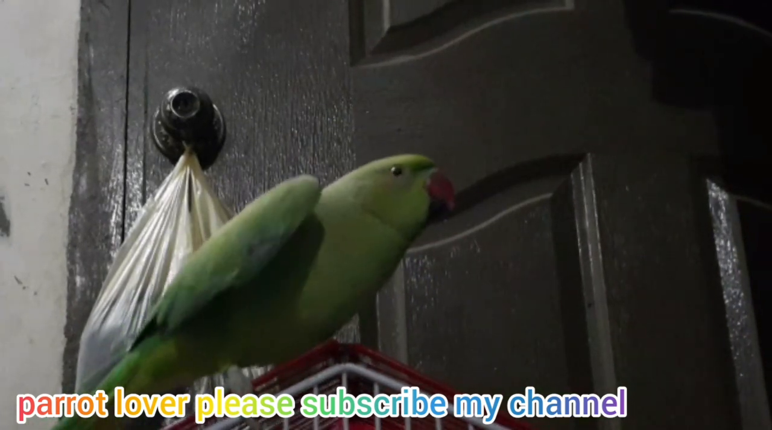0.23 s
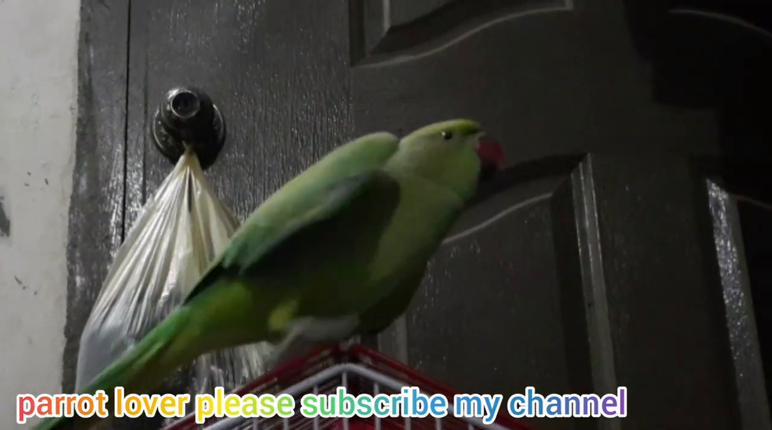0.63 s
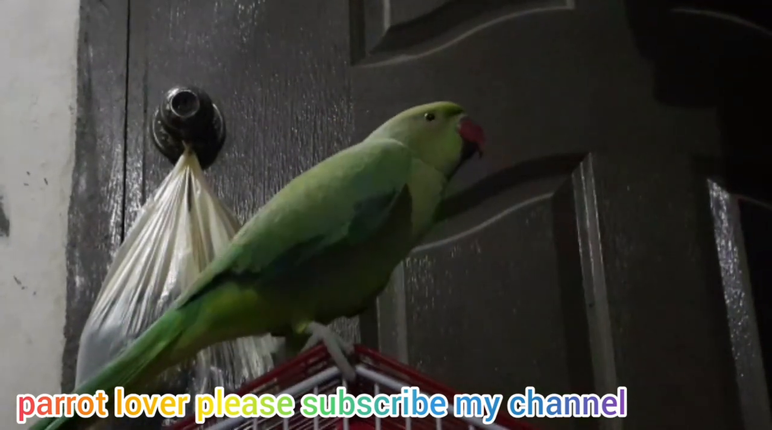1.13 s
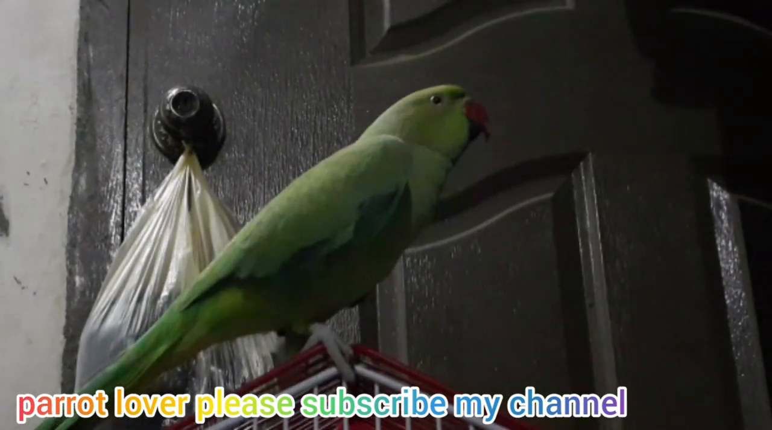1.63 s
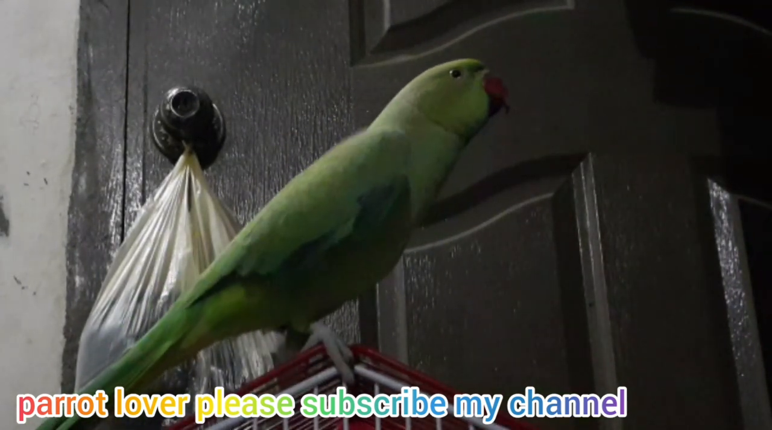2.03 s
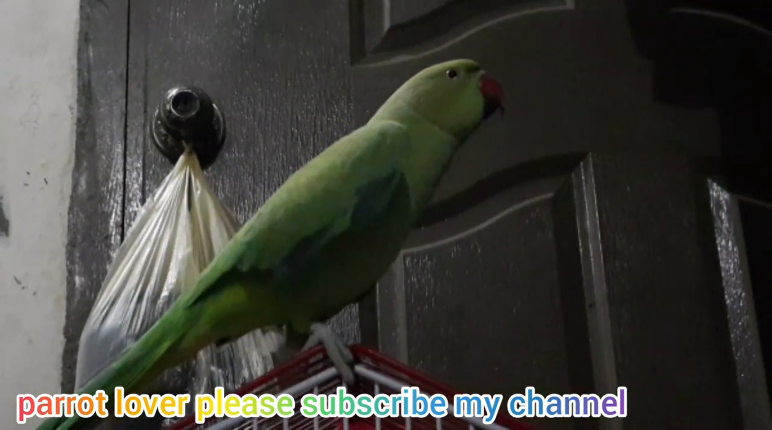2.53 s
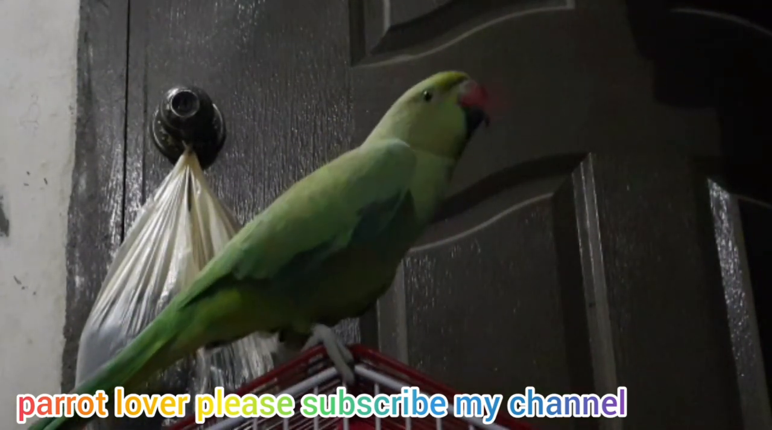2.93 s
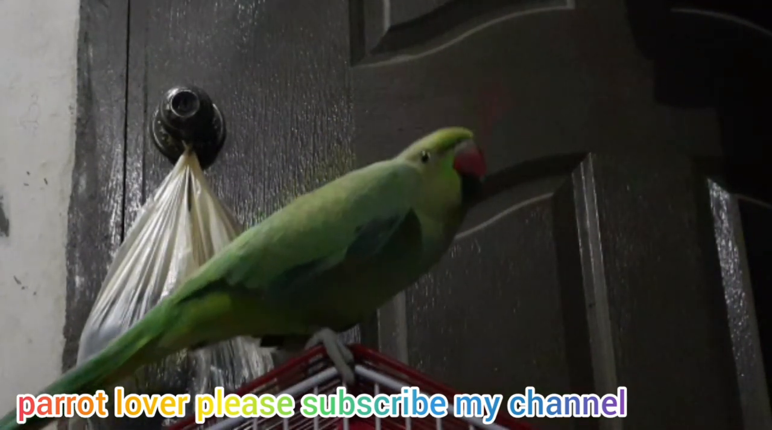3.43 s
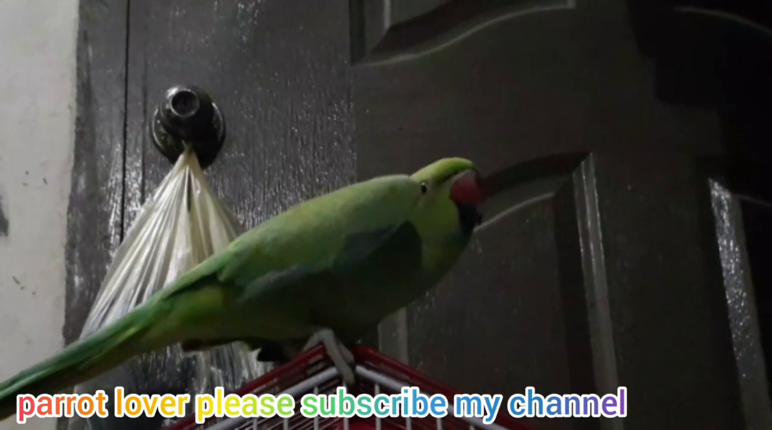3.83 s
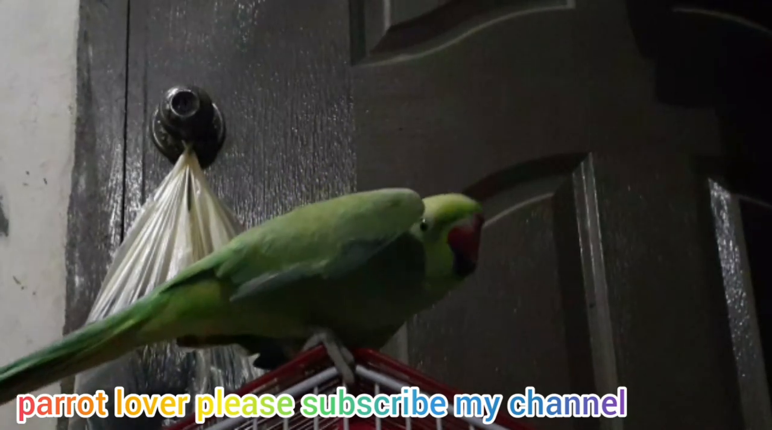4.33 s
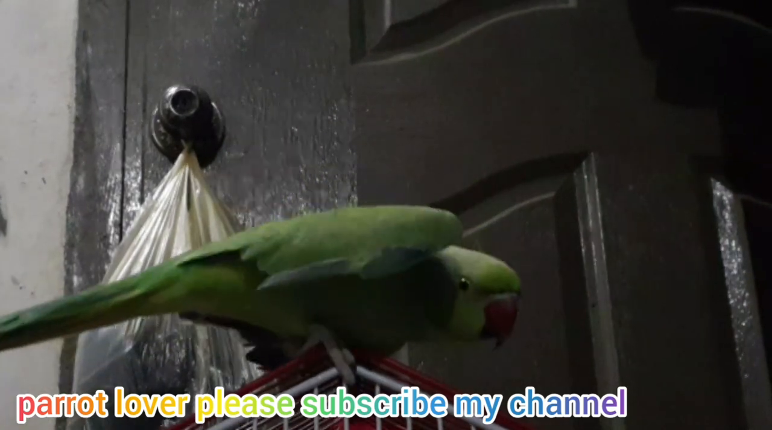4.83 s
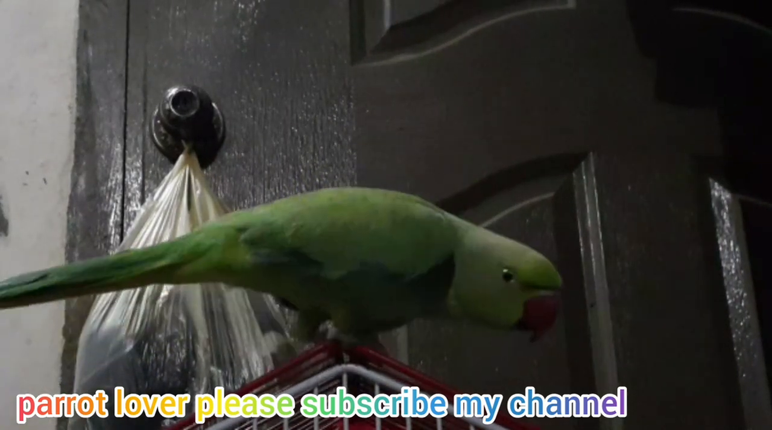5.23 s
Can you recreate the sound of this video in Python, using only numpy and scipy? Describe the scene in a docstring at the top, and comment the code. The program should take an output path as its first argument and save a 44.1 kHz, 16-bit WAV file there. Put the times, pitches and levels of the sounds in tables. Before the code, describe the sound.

A parakeet calls close to the microphone in a small, hard-walled room that adds a short echo. Right at the start it gives one sharp, high, rising chirp. From about 0.6 to 1 second come two airy whistles, the first climbing slowly, the second dipping and shooting up. Between 1.8 and 2.7 seconds it makes five softer, low, raspy clucks, evenly spaced. At 3 seconds a loud, harsh, very short rattle opens into a brief nasal whine. A cleaner whistle falls and levels off from 3.5 to 3.75 seconds. From about 3.95 to 4.35 seconds a rich, drawn-out squawk arches up and down, hardening as it goes. Under the calls lie a faint low room rumble and a few barely audible drifting tones. The rumble eases once the bird stops, and a very soft rustle comes at about 5.4 seconds.

```python
"""A small, hard-walled room, a ring-necked parakeet calling close by: gliding whistles, five low clucks,
a rattle that opens into a whine, a falling whistle and an arched squawk. Its syrinx sounds a harmonic
stack shaped by throat and beak, or slaps open in noisy bursts for the rattle. Pitch and effort set the
timbre; a slow flutter now and then splits the tone. Door and walls answer. Under the calls lie a low
rumble and a few faint drifting tones; a soft rustle comes at the end."""
import sys
import numpy as np
from scipy import signal
from scipy.fft import rfft, irfft, next_fast_len
from scipy.io import wavfile
from scipy.ndimage import uniform_filter1d, map_coordinates

SR = 44100
rng = np.random.default_rng(int(sys.argv[2]) if len(sys.argv) > 2 else 0)


def persist_wave(psi):
    """Save psi, clipped to +-1, as 16-bit WAV."""
    counts = np.round(np.clip(psi, -1, 1) * 32767).astype(np.int16)
    wavfile.write(sys.argv[1], SR, np.atleast_2d(counts).T)


N = 242550
TOP_HZ = 15900
FLUTTER_HZ, FLUTTER_TREBLE_DB_PER_RAD = 336.5, 33


def amp(db):
    """Decibels to gain."""
    return 10 ** (np.asarray(db) / 20)


def unit(x):
    """Scale to rms 1."""
    return x / np.sqrt(np.mean(x ** 2) + 1e-20)


def along(points, hz):
    """(Hz, value) points read on a log axis."""
    f, v = np.transpose(points)
    return np.interp(np.log(hz + 1), np.log(f + 1), v)


def curves(rows, at):
    """Each later column, interpolated over the first."""
    axis, *columns = np.transpose(rows)
    return [np.interp(at, axis, column) for column in columns]


def wobble(knots_per_s, t):
    """Smooth random curve."""
    return map_coordinates(rng.standard_normal(8192), [(t - t[0]) * knots_per_s], mode="wrap")


def gate(t, start_s, end_s, attack_s, release_s):
    """Smooth onset, hold, exponential release."""
    onset = np.sin(np.pi / 2 * np.clip((t - start_s) / attack_s + .5, 0, 1)) ** 2
    return onset * np.exp(-np.maximum(t - end_s, 0) / release_s)


def filtered(x, response):
    """Zero-phase filter; response maps Hz to gain."""
    size = next_fast_len(x.shape[-1] + 8192)
    return irfft(rfft(x, size) * response(np.fft.rfftfreq(size, 1 / SR)), size)[..., :x.shape[-1]]


def coloured(noise, colour):
    """Noise shaped by (Hz, dB) points, at rms 1."""
    return unit(filtered(noise, lambda hz: amp(along(colour, hz))))


def stereo_noise(samples, coherence):
    """Noise pair with left-right coherence set by (Hz, coherence) points."""
    def mid_side_gains(hz):
        angle = np.arccos(np.clip(along(coherence, hz), -1, 1)) / 2
        return np.array([np.cos(angle), np.sin(angle)])
    mid, side = filtered(rng.standard_normal((2, samples)), mid_side_gains)
    return np.array([mid + side, mid - side])


def rumble(t, level_db=-63, drop_db=4, drop_at_s=4.4):
    """Low room noise that drops as the bird falls silent."""
    # Each row: frequency in Hz, relative density in dB.
    colour = [(28, -20.5), (44, 4.5), (62, -10), (91, -7), (178, -0.5), (331, -4), (440, -9.5), (537, -7),
              (848, -10.5), (1110, -18.5), (1450, -23), (1700, -19), (2120, -30), (15500, -40)]
    noise = stereo_noise(N, coherence=[(120, .87), (950, 1.0), (4000, .13)])
    settled = np.clip((t - drop_at_s) / .21 + .5, 0, 1)
    return coloured(noise, colour) * amp(level_db - drop_db * settled)


def faint_tones(t, gain_db=8, sag_per_s=.17, thin_hz=1740, thin_db=-85.5):
    """Brief tones sagging in pitch, plus one thin tone that wavers throughout."""
    # Each row: start in seconds, end in seconds, starting pitch in Hz, level in dB before gain_db.
    notes = [(0.01, 0.214, 930, -72), (0.218, 0.3, 644.5, -69), (0.097, 0.285, 319, -69),
             (.33, .62, 874, -75), (1.77, 1.864, 396, -63), (1.965, 2.086, 402, -65),
             (2.11, 2.587, 357.9, -70.5)]
    tones = np.zeros(N)
    for start_s, end_s, start_hz, db in notes:
        pitch_hz = start_hz * np.exp(-sag_per_s * (t - start_s)) * (1 + .022 * wobble(90, t))
        envelope = amp(db + gain_db + 4 * wobble(25, t)) * gate(t, start_s, end_s, .044, .03)
        tones += envelope * np.sin(2 * np.pi * np.cumsum(pitch_hz) / SR)
    wavering_hz = thin_hz * (1 + .012 * wobble(87, t))
    return tones + amp(thin_db) * np.sin(2 * np.pi * np.cumsum(wavering_hz) / SR)


def rustle(t, start_s=5.41, end_s=5.5, level_db=-73):
    """One soft puff of high noise."""
    # Each row: frequency in Hz, gain in dB.
    colour = [(1500, -20), (4000, -7), (10000, -9), (15000, 3)]
    envelope = amp(level_db + 2 * wobble(56, t)) * gate(t, start_s, end_s, .016, .03)
    return envelope * coloured(rng.standard_normal((2, N)), colour)


def small_room(x, early_db=-6, tail_db=-6.5, build_s=.0021):
    """Direct sound, echoes from the door and near walls, and a diffuse tail."""
    # Each row: left delay in seconds, right delay in seconds, gain in dB before early_db.
    echoes = [(.0011, 0.00096, -20), (.0027, .0024, -10), (.0046, 0.01, -3.5), (.0078, 0.0013, -14.5),
              (0.0098, 0.014, -15)]
    # Each row: frequency in Hz, T60 in seconds.
    t60_s = [(300, 0.35), (900, 0.19), (2000, 0.24), (4000, 0.24), (8000, 0.26), (15000, 0.16)]
    # Each row: frequency in Hz, left-right coherence.
    coherence = [(300, .9), (1000, .7), (3000, 0.13), (8000, 0.033)]
    hz, t, spectra = signal.stft(stereo_noise(SR // 2, coherence), SR, nperseg=256)
    envelope = amp(-60 * t / along(t60_s, hz)[:, None]) * (1 - np.exp(-t / build_s))
    _, tail = signal.istft(spectra * envelope, SR, nperseg=256)
    response = amp(tail_db) * tail / np.linalg.norm(tail[0])
    response[[0, 1], [1, 0]] += 1  # direct sound: right leads by one sample
    for left_s, right_s, db in echoes:
        response[[0, 1], [round(left_s * SR), round(right_s * SR)]] += amp(early_db + db)
    return signal.fftconvolve(x, response, axes=1)[:, :N]


def door_notch(x, centre_hz=972, width_hz=110, depth_db=5):
    """The door's reflection partly cancels the bird in one narrow band."""
    return filtered(x, lambda hz: amp(-depth_db * np.exp(-((hz - centre_hz) / width_hz) ** 2)))


def head_turns(x, t):
    """Mono to stereo; the balance shifts as the head turns."""
    # Each row: time in seconds, left minus right in dB.
    pan = [(0, -3), (3.25, -2.5), (3.54, -5), (3.59, 2.5), (3.75, -0.5), (4.03, -1.5)]
    pan_db, = curves(pan, t)
    return x * amp(np.array([pan_db, -pan_db]) / 2)


def beak_beam(x):
    """The beak beams the treble near 5 kHz to the right."""
    # Each row: frequency in Hz, left minus right in dB.
    balance = [(700, 0.5), (1400, 0.5), (2800, 1), (5000, -2), (12000, 0.5)]
    return filtered(x, lambda hz: amp(np.array([along(balance, hz), -along(balance, hz)]) / 2))


def flutter_rad(t):
    """Phase depth of a second, slower vibration that adds side tones to every harmonic."""
    # Each row: centre in seconds, half length in seconds, depth in radians.
    spells = [(3.212, 0.023, 0.15), (3.587, 0.077, .12), (3.739, .035, 0.36), (4.313, 0.022, 0.13)]
    return sum(rad * np.exp(-((t - centre_s) / half_s) ** 2) for centre_s, half_s, rad in spells)


def membrane_phase(t, pitch_hz, jitter, slack_below_hz=1200, collapse_per_s=10):
    """The membranes never hold pitch exactly; as a low note collapses they go slack and hoarse."""
    fall_per_s = -np.gradient(np.log(pitch_hz)) * SR
    slack = np.clip(fall_per_s / collapse_per_s, 0, 1) * (pitch_hz < slack_below_hz)
    unsteadiness = jitter + .03 * uniform_filter1d(slack, size=256)
    phase = 2 * np.pi * np.cumsum(pitch_hz * (1 + unsteadiness * wobble(1000, t))) / SR
    return phase + flutter_rad(t) * np.sin(2 * np.pi * FLUTTER_HZ * t)


def syrinx(controls, throat, jitter, rasp, hiss_db, attack_s, treble_hz=7600, full_voice_db=-35):
    """One call: a gliding harmonic stack, shaped by throat and beak."""
    start_s, end_s = controls[0][0], controls[-1][0]
    span = np.arange(max(int((start_s - .02) * SR), 0), int((end_s + .04) * SR))
    t = span / SR
    pitch_hz, level_db, overtones_db, treble_db = curves(controls, t)
    phase = membrane_phase(t, pitch_hz, jitter)
    k = np.arange(2, 33)[:, None]
    hz = k * pitch_hz
    softness = np.clip((full_voice_db - level_db) / 7, 0, 2)  # soft notes roll off faster
    weight = amp(along(throat, hz)) * np.clip((TOP_HZ - hz) / 500 + 1, 0, 1) * k ** -softness
    high = np.clip((hz - treble_hz) / 800 + .5, 0, 1)
    normalised = lambda w: w / np.sqrt(np.sum(w ** 2, axis=0) + 1e-9)
    weight = normalised(weight * (1 - high)) + amp(treble_db) * normalised(weight * high)
    # Turbulent air shakes each overtone and hisses between the highest ones.
    shake = 1 + rasp * np.array([wobble(1200, t) for _ in k])
    hiss_band = lambda f: amp(along(throat, f)) * f ** 4 / (f ** 4 + treble_hz ** 4)
    hiss = unit(filtered(rng.standard_normal(len(t)), hiss_band))
    overtones = np.sum(weight * shake * np.sin(k * phase), axis=0) + amp(treble_db + hiss_db) * hiss
    power = (1 + amp(overtones_db) ** 2 * (1 + amp(treble_db) ** 2)) / 2
    voice = (np.sin(phase) + amp(overtones_db) * overtones) / np.sqrt(power)
    call = np.zeros(N)
    call[span] = amp(level_db) * voice * gate(t, start_s, end_s, attack_s, .003)
    return call


def contour(glide):
    """Time, pitch and level of a glide, finely stepped."""
    t = np.linspace(glide[0][0], glide[-1][0], 400)
    return t, *curves(glide, t)


def whistled(glide, overtones_db, treble_db):
    """Syrinx controls for a whistle: pitch sets the timbre, flutter brightens it."""
    # Each row: pitch in Hz, overtones re fundamental in dB, treble re overtones in dB; calls add offsets.
    registers = [(615, -13.5, -18.5), (1203, -23, -30), (1450, -21.5, -26.5), (1832, -25, 5),
                 (2070, -20, 1.5), (2450, -14, -2.5), (2800, -8.5, -7), (3650, -16, -6)]
    t, pitch_hz, level_db = contour(glide)
    base_overtones_db, base_treble_db = curves(registers, pitch_hz)
    bright_db = base_treble_db + treble_db + FLUTTER_TREBLE_DB_PER_RAD * flutter_rad(t)
    return np.column_stack([t, pitch_hz, level_db, base_overtones_db + overtones_db, bright_db])


def pressed(t, pitch_hz, level_db, overtones_db, treble_db, harden_db, dulling):
    """Syrinx controls for a low call: overtones dull below mean level and ramp by harden_db."""
    soft_db = dulling * np.minimum(level_db - np.mean(level_db), 0)
    ramp_db = harden_db * np.linspace(-.5, .5, len(t))
    # The treble dulls faster than the overtones and falls behind as they grow.
    bright_db = treble_db + 2.2 * soft_db - 1.1 * ramp_db + FLUTTER_TREBLE_DB_PER_RAD * flutter_rad(t)
    return np.column_stack([t, pitch_hz, level_db, overtones_db + soft_db + ramp_db, bright_db])


def cluck_contour(top_s, rise_s, fall_s, width_s, top_hz, top_db, swell_db_per_s=279, push_db=4):
    """Time, pitch and level of a cluck: it swells as it climbs, then collapses with a last push."""
    t = np.linspace(-rise_s, fall_s, 100)
    rising = t < 0
    arch = np.exp(-(t / np.where(rising, width_s, .65 * width_s)) ** 2)
    base_hz = np.where(rising, 569, 494.8)
    level_db = top_db + np.where(rising, swell_db_per_s * t, push_db * np.sin(np.pi * t / fall_s))
    return top_s + t, base_hz + (top_hz - base_hz) * arch, level_db


def clucks():
    """Five low, raspy arches of pitch."""
    # Each row: time of the top, rise, fall and width in seconds, top pitch in Hz, level there in dB.
    arches = [(1.799, .005, 0.036, 0.026, 1133, -46), (1.987, .0095, 0.029, 0.024, 1080, -38),
              (2.21, .049, .045, .038, 960, -34.5), (2.454, .054, .038, 0.028, 955, -35),
              (2.703, 0.054, .035, .029, 980, -36.5)]
    # Each row: frequency in Hz, gain in dB.
    throat = [(900, 12.5), (1300, 7), (1850, 11), (2700, -6), (3700, 8), (4500, -10), (5500, 9),
              (6800, -17), (8500, -30), (11000, -45), (15500, -40.5)]
    calls = np.zeros(N)
    for arch in arches:
        controls = pressed(*cluck_contour(*arch), overtones_db=4.5, treble_db=-15, harden_db=3, dulling=.75)
        calls += syrinx(controls, throat, jitter=.014, rasp=.38, hiss_db=-6, attack_s=.009)
    return calls


def rattle(t):
    """The syrinx slaps open about sixty times a second, each time with a harsh burst."""
    # Each row: start in seconds, level in dB, length in seconds.
    bursts = [(2.9952, -41, 0.0049), (3.0111, -42, 0.0096), (3.0274, -17, 0.0072), (3.0435, -19.5, 0.0093),
              (3.0616, -14, .0062), (3.0794, -14, .0072), (3.0972, -17, .0052)]
    # Each row: frequency in Hz, gain in dB.
    throat = [(300, -49), (700, -19.5), (1200, -11), (1700, -3), (2400, -1.5), (3300, 1.5), (4400, -11),
              (6300, -14), (8500, -21.5), (10000, -33.5), (11500, -23), (16000, -30)]
    envelope = sum(amp(db) * gate(t, start_s, start_s + length_s / 2, .0049, length_s / 3)
                   for start_s, db, length_s in bursts)
    return envelope * coloured(rng.standard_normal(N), throat)


def whine():
    """A held note whose overtones outweigh the fundamental."""
    # Each row: time in seconds, pitch in Hz, level in dB.
    glide = [(3.157, 1592, -25.5), (3.171, 1522, -26), (3.189, 1449, -23.5), (3.205, 1503, -22.5),
             (3.225, 1498, -24.5), (3.249, 1597, -30.5)]
    # Each row: frequency in Hz, gain in dB.
    throat = [(2950, 6), (4450, 0), (5850, -6), (7350, -19), (8900, -24.5), (11600, -28.5), (15400, -37.5)]
    controls = pressed(*contour(glide), overtones_db=10, treble_db=-21, harden_db=-.5, dulling=.4)
    return syrinx(controls, throat, jitter=.005, rasp=.15, hiss_db=-11, attack_s=.004)


def whistles():
    """High, nearly pure glides with an airy edge: three rise, a cleaner one falls."""
    # Each row: time in seconds, pitch in Hz, level in dB.
    upsweep = [(0.002, 1790, -27.5), (0.016, 1844, -32.5), (0.044, 2740, -27.5), (0.062, 3470, -20.5),
               (0.07, 3640, -16.5), (0.08, 3660, -22)]
    slow_rise = [(0.626, 634.6, -53), (0.636, 944, -55.5), (0.644, 1147, -46), (0.678, 1218, -47.5),
                 (0.74, 1707, -35.5), (0.774, 2232, -32.5), (0.802, 2509, -25.5), (0.828, 2905, -28),
                 (0.84, 2950, -33)]
    dip_and_rise = [(0.874, 3280, -26.5), (0.884, 2983, -26.5), (0.902, 2447, -26.5), (0.92, 2133, -40.5),
                    (0.954, 1932, -37), (0.978, 2032, -34.5), (0.992, 2315, -24.5), (1.012, 2973, -17.5),
                    (1.028, 3447, -18)]
    downsweep = [(3.458, 2850, -40.5), (3.462, 2913, -36), (3.492, 2412, -30), (3.516, 2277, -29),
                 (3.57, 2029, -48.5), (3.6, 1950, -32), (3.634, 1908, -24.5), (3.668, 1810, -21),
                 (3.72, 1984, -20), (3.732, 2015, -28), (3.751, 2024, -31)]
    # Each row: frequency in Hz, gain in dB.
    throat = [(2400, 18), (3600, 2), (5600, -4.5), (7300, -6), (8400, -5), (10300, 3), (12100, -9.5),
              (13300, -1.5), (15600, -9.5)]
    rises = (whistled(upsweep, overtones_db=4.5, treble_db=-4),
             whistled(slow_rise, overtones_db=0, treble_db=3),
             whistled(dip_and_rise, overtones_db=-4.5, treble_db=5))
    fall = whistled(downsweep, overtones_db=0, treble_db=-1)
    rising = sum(syrinx(rise, throat, jitter=.011, rasp=.38, hiss_db=-2, attack_s=.006) for rise in rises)
    return rising + syrinx(fall, throat, jitter=.003, rasp=.18, hiss_db=-12, attack_s=.014)


def squawk():
    """A long, low arch of pitch, rich in overtones and hardening as it goes."""
    # Each row: time in seconds, pitch in Hz, level in dB.
    glide = [(3.944, 553, -40), (3.956, 741, -45), (3.972, 953, -39.5), (3.998, 937.6, -29),
             (4.012, 993, -37.5), (4.028, 1045, -30.5), (4.078, 1141, -24), (4.144, 1335, -23.5),
             (4.208, 1205, -23), (4.232, 1212, -21), (4.26, 1111, -20), (4.274, 1025, -27.5),
             (4.304, 937.5, -20), (4.326, 772, -26.5), (4.348, 603.6, -36.5)]
    # Each row: frequency in Hz, gain in dB.
    throat = [(1300, 5), (1900, 8.5), (2400, 7.5), (2900, -2.5), (3700, 3.5), (4900, 9), (6200, -0.5),
              (8200, -8), (10500, -9.5), (12500, -29.5), (15500, -15.5)]
    controls = pressed(*contour(glide), overtones_db=6, treble_db=-14, harden_db=3, dulling=.3)
    return syrinx(controls, throat, jitter=.003, rasp=.09, hiss_db=-8, attack_s=.012)


def scene():
    """The bird in its room over the background, both a little to the right."""
    t = np.arange(N) / SR
    bird = whistles() + clucks() + whine() + squawk() + rattle(t)
    placed = head_turns(door_notch(bird), t)
    heard = beak_beam(small_room(placed))
    background = rumble(t) + faint_tones(t) + rustle(t)
    return heard + background * amp([[-1.25], [1.25]])


def record(dry):
    """Steep low-pass at TOP_HZ."""
    return filtered(dry, lambda hz: np.clip((TOP_HZ - hz) / 200 + .5, 0, 1))


dry = scene()
out = record(dry)
persist_wave(out)
```